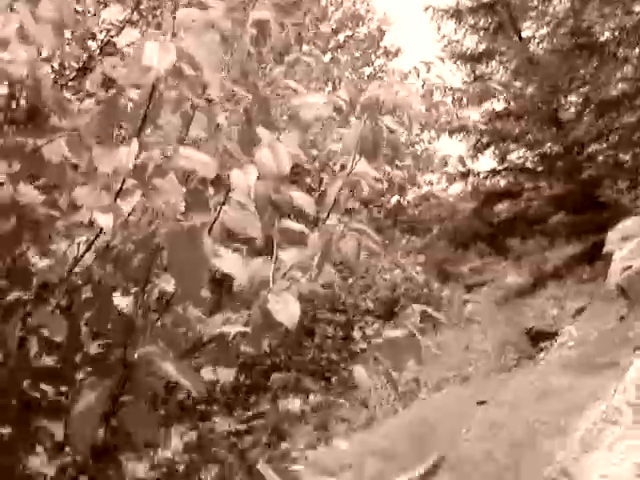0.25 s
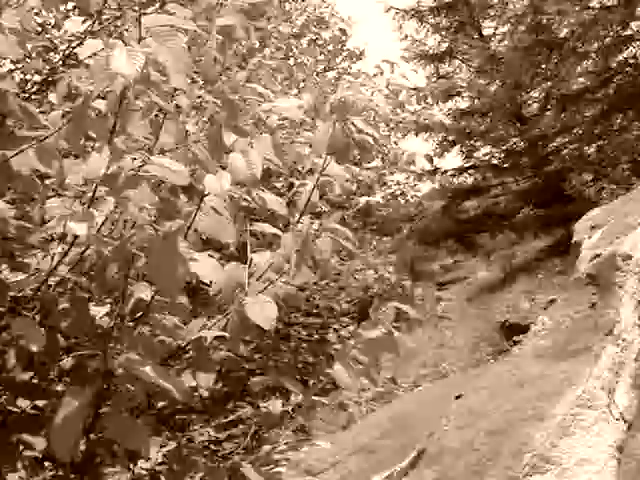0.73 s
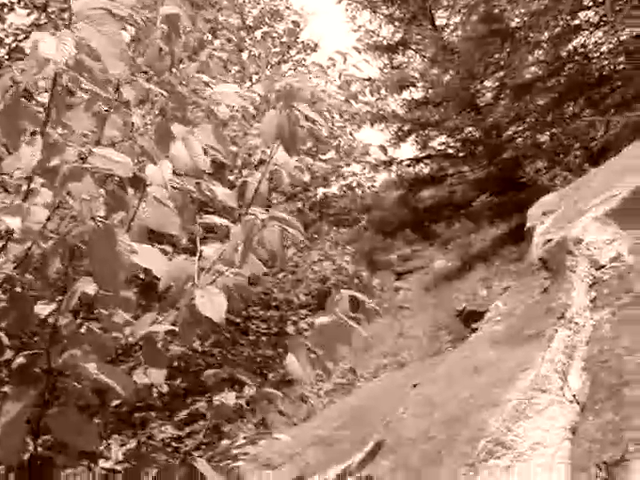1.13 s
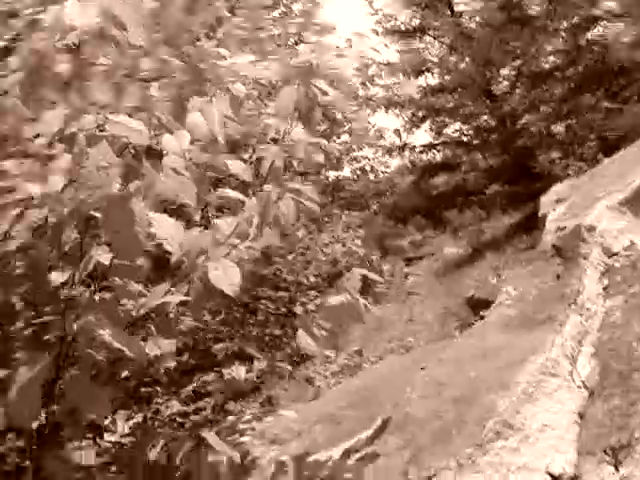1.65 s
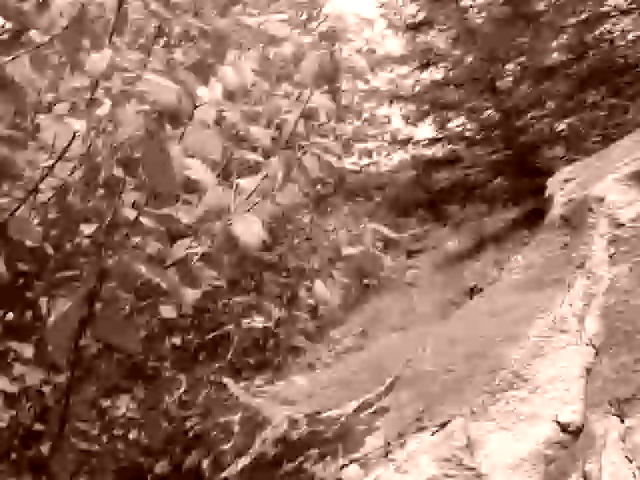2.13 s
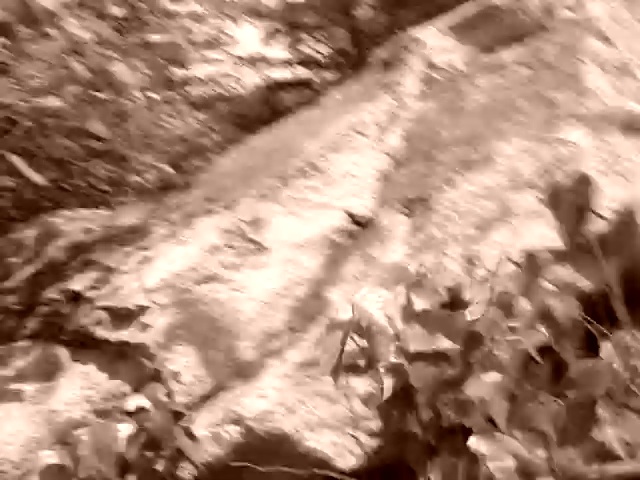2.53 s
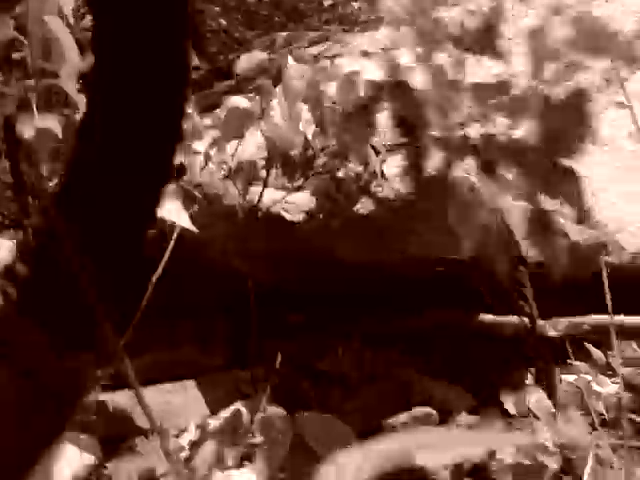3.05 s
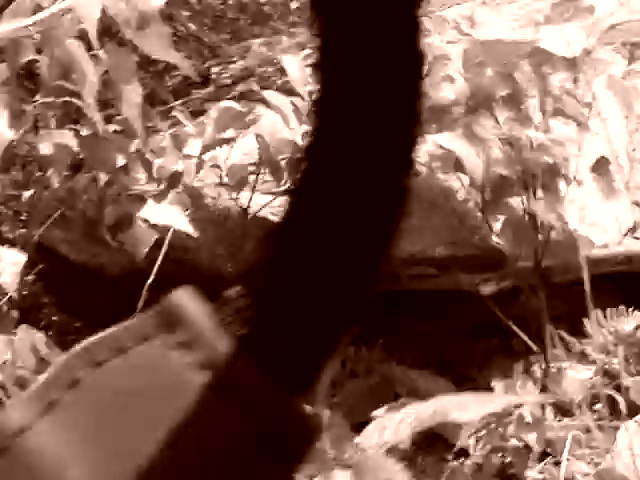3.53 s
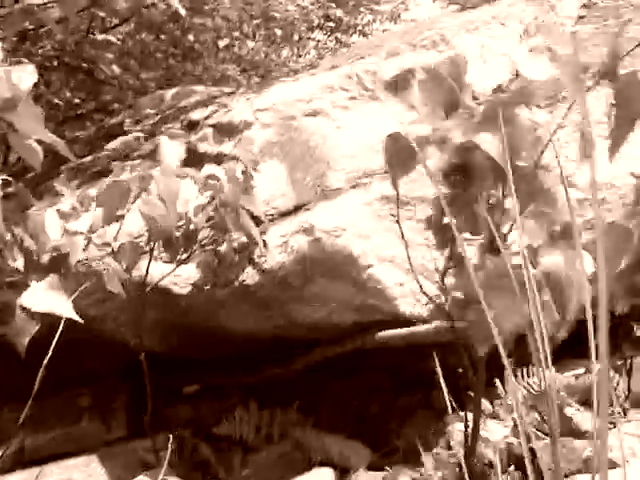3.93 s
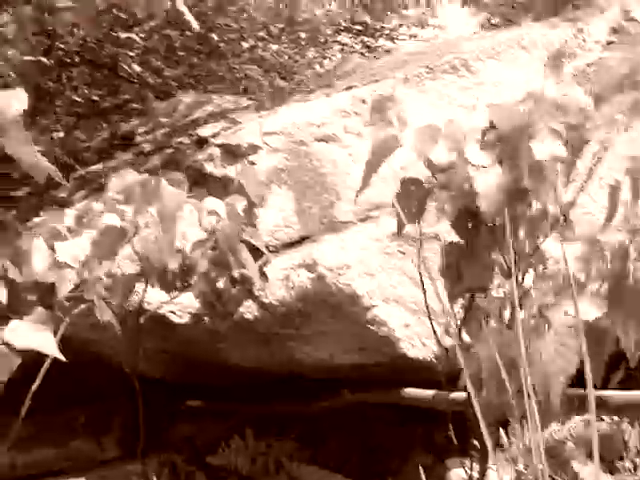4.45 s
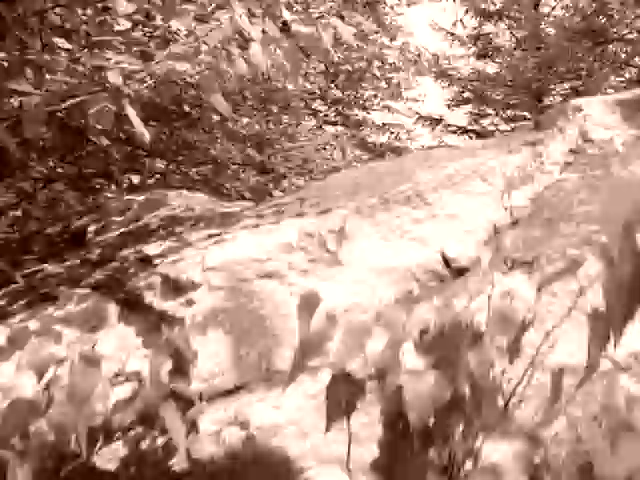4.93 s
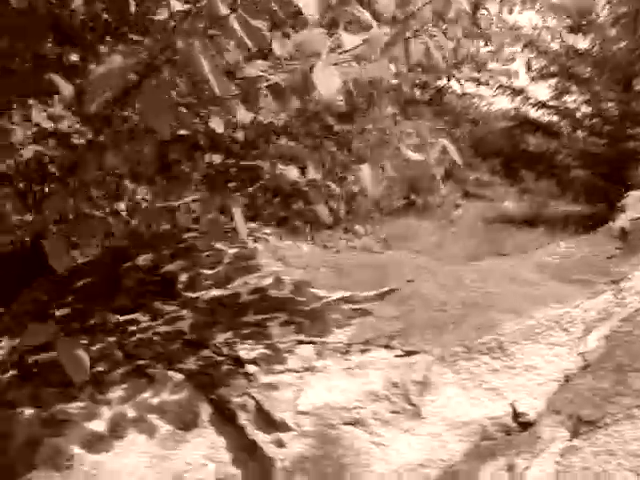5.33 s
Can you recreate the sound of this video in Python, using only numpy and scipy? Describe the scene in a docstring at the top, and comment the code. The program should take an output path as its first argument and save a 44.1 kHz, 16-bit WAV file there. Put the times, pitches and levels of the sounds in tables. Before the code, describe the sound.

Dry leaves rustle and twigs crack underfoot over the continuous high, dry buzz of a snake's rattle.

```python
"""Rattlesnake in brushy woods

A rattlesnake buzzes under a rock slab, its hollow tail segments clashing twice per shake.
Someone steps about close by: leaves rustle, soil crunches, twigs snap, loose stones knock,
stems scrape and a nylon strap or fabric squeaks faintly. The hand-held camera rumbles,
and a few low thumps sound, mostly at loud snaps."""
import sys
import numpy as np
from scipy import signal
from scipy.fft import rfft, irfft, next_fast_len
from scipy.io import wavfile
from scipy.ndimage import uniform_filter1d

SR = 44100
rng = np.random.default_rng(int(sys.argv[2]) if len(sys.argv) > 2 else 0)


def pcm_store(signal):
    """Save signal as 16-bit PCM."""
    levels = np.round(np.clip(np.atleast_2d(signal), -1, 1) * 32767)
    wavfile.write(sys.argv[1], SR, levels.astype(np.int16).T)


N = 246519
TIME_S = np.arange(N) / SR


def gain_of(db):
    """Decibels to amplitude factor."""
    return 10 ** (np.asarray(db) / 20)


def unit_rms(x):
    """Scale to rms 1."""
    return x / np.sqrt(np.mean(x ** 2) + 1e-20)


def follow(rows):
    """Per-sample curves from (time [s], values...) rows."""
    times_s, *columns = np.transpose(rows)
    return [np.interp(TIME_S, times_s, column) for column in columns]


def add(mix, start_s, sound):
    """Mix a sound in at start_s."""
    part = mix[max(round(start_s * SR), 0):][:len(sound)]
    part += sound[:len(part)]


def band(x, low_hz, high_hz, order=2):
    """Causal band-pass."""
    edges_hz = np.clip([low_hz, max(high_hz, low_hz + 10)], 1, SR / 2 - 1)
    return signal.sosfilt(signal.butter(order, edges_hz, "band", fs=SR, output="sos"), x)


def ring(x, hz, width_hz):
    """Unity-gain resonance; the centre may move."""
    carrier = np.exp(2j * np.pi * np.cumsum(hz * np.ones(len(x))) / SR)
    pole = np.exp(-np.pi * width_hz / SR)
    return 2 * (carrier * signal.lfilter([1 - pole], [1, -pole], x / carrier + 1e-18)).real


def colour(x, spectrum):
    """Filter by (frequency [Hz], gain [dB]) rows; rms 1."""
    size = next_fast_len(N)
    hz, db = np.transpose(spectrum)
    curve_db = np.interp(np.log(np.fft.rfftfreq(size, 1 / SR) + 1), np.log(hz), db)
    return unit_rms(irfft(rfft(x, size) * gain_of(curve_db), size)[:N])


def wander(rate_hz):
    """Smooth random drift, rolling off at rate_hz; rms 1."""
    size = next_fast_len(N)
    lowpass = np.exp(-(np.fft.rfftfreq(size, 1 / SR) / rate_hz) ** 2)
    return unit_rms(irfft(rfft(rng.standard_normal(size)) * lowpass, size)[:N])


def grains(per_s, spread_db):
    """Random clicks of either sign, a few much larger than the rest; rms 1."""
    size = gain_of(spread_db * np.minimum(rng.exponential(1, N), 4))
    return unit_rms(size * rng.choice([-1, 1], N) * (rng.random(N) < per_s / SR))


def at_level(x, level_db):
    """Set the rms of the loudest 3 ms."""
    return gain_of(level_db) * x / np.sqrt(uniform_filter1d(x ** 2, size=132).max() + 1e-20)


def stone_reflections(x, depth_db, width_bins):
    """Reflections from nearby stones lift and drop patches of the spectrum; rms 1."""
    spectra = signal.stft(x, SR, nperseg=512)[2]
    patches = uniform_filter1d(rng.standard_normal(spectra.shape), size=width_bins, axis=0)
    patches = uniform_filter1d(patches, size=9, axis=1)
    patches = patches - uniform_filter1d(patches, size=width_bins * 4, axis=0)
    spectra = spectra * gain_of(depth_db * unit_rms(patches))
    return unit_rms(signal.istft(spectra, SR, nperseg=512)[1][:N])


def rattle(backswing=0.19, clash_width=0.21, chatter=1.0, uneven_db=0.93, reflection_db=2.5):
    """Tail segments clash at both ends of each swing and chatter between; the slab's gap resonates."""
    # rattle as the microphone moves past: (time [s], level [dB], upper over lower ring [dB])
    passing = [(0, -36, -8), (0.8, -36, -5), (2.2, -37.5, -7.5), (2.5, -37, -5), (2.95, -36, -7),
               (3.4, -32.5, -3.5), (3.9, -34.5, -10.5), (4.4, -34, -12.5), (5.05, -39.3, -4.5),
               (5.25, -44.5, -4.5), (5.59, -51.5, -4.5)]
    # tail shaking: (time [s], rate [Hz])
    shake = [(0, 79), (.6, 79.5), (1.7, 77.7), (3.8, 77.4), (4.3, 76), (4.8, 75.4), (5.59, 74)]
    # how squarely the microphone faces the gap: (time [s], share [0-1])
    aim = [(0, .05), (3.4, 0.5), (3.75, 0), (4.25, 0.5), (4.45, 0), (4.7, 1), (5.05, 0.3), (5.59, 0.3)]
    # ring of the horny segments: (frequency [Hz], gain [dB])
    segment_spectrum = [(1500, -46), (3000, -38), (3950, -23.5), (4450, -7), (5500, -3.5), (6400, -1.8),
                        (7400, 1.5), (8400, 3.5), (9300, 2.5), (10100, -5.5)]
    # resonances of the gap: (centre [Hz], width [Hz], gain [dB])
    gap_modes = [(4900, 330, 6), (6220, 360, 4.5), (7280, 330, 4.5)]
    level_db, tilt_db = follow(passing)
    facing = np.clip(follow(aim)[0], 0, 1)
    shake_hz = follow(shake)[0] * (1 + 0.0326 * wander(13.9))
    swings = 2 * np.cumsum(shake_hz) / SR
    clash = np.exp(-((swings % 1 - 0.5) / clash_width) ** 2) * np.where(swings % 2 < 1, 1, backswing)
    # off the gap's axis, scattered sound fills the pauses between clashes
    force = (chatter + clash * (0.5 + 0.5 * facing)) * gain_of(uneven_db * wander(73))
    flutter = gain_of(0.5 * wander(45))
    clicks = unit_rms(force * flutter * grains(per_s=22000, spread_db=1.7))

    hz, frame_s, spectra = signal.stft(clicks, SR, nperseg=256)
    ring_hz, ring_db = np.transpose(segment_spectrum)
    shape_db = np.interp(np.log(hz + 1), np.log(ring_hz), ring_db)[:, None]
    tilt = np.tanh((hz - 7500) / 1000) / 2
    shape_db = shape_db + np.outer(tilt, np.interp(frame_s, TIME_S, tilt_db))
    gap_db = sum(db * np.exp(-((hz - centre_hz) / width_hz) ** 2) for centre_hz, width_hz, db in gap_modes)
    shape_db = shape_db + np.outer(gap_db, np.interp(frame_s, TIME_S, facing))
    # reflections from stones shift as tail and microphone move
    patches = uniform_filter1d(rng.standard_normal(spectra.shape), size=36, axis=1)
    patches = uniform_filter1d(patches, size=2, axis=0)
    shape = gain_of(shape_db + reflection_db * unit_rms(patches))
    shape /= np.sqrt((shape[hz > 6000] ** 2).sum(0))  # constant treble power gain
    buzz = signal.istft(spectra * shape, SR, nperseg=256)[1][:N]
    return gain_of(level_db) * unit_rms(buzz)


def handling():
    """Hand rumble carried by the camera's body."""
    # rumble: (time [s], level [dB])
    levels = [(0, -63.5), (2, -69.5), (2.3, -59.5), (2.9, -63.5), (4.9, -68.5), (5.15, -61), (5.35, -65),
              (5.52, -60), (5.59, -45)]
    # body response: (frequency [Hz], gain [dB])
    spectrum = [(15, 3.0), (35, -0.5), (90, 7.5), (170, -1.0), (500, -25.0), (2000, -77)]
    return gain_of(follow(levels)[0]) * colour(rng.standard_normal(N), spectrum)


def air(level_db=-60.5):
    """Faint, steady hush of the woods."""
    # still air: (frequency [Hz], gain [dB])
    spectrum = [(20, -13), (70, -12), (200, 9.5), (450, 14), (900, 7), (1800, -20), (4000, -14.5),
                (10000, -11)]
    return gain_of(level_db) * colour(rng.standard_normal(N), spectrum)


def footsteps(leaf_floor_db=-53, soil_floor_db=-54, roundness=1.42):
    """Each step swells and fades: leaves crackle in clumps, soil crunches under the weight."""
    # steps and pushes through brush: (peak time [s], rise [s], fall [s], leaves [dB], soil [dB])
    steps = [(0.192, 0.053, 0.013, -34, -48.5), (0.366, 0.055, 0.029, -33, -45),
             (0.47, 0.055, 0.086, -44.5, -44.5), (0.69, 0.028, 0.067, -40, -52),
             (0.838, 0.011, 0.017, -29.5, -49), (1.07, 0.071, 0.046, -31.5, -48.5),
             (1.388, 0.05, 0.027, -32, -46), (1.56, 0.22, 0.15, -44.5, -52),
             (1.87, 0.094, 0.21, -52, -43.5), (2.02, 0.11, 0.077, -32, -41.5),
             (2.165, 0.013, 0.011, -38, -44), (2.239, .02, 0.056, -43.5, -48.5),
             (2.55, .14, 0.14, -35.5, -35.5), (2.851, 0.093, 0.13, -35, -41),
             (3.07, 0.19, 0.18, -30.5, -45), (3.36, 0.061, 0.27, -39.5, -47.5),
             (3.555, 0.033, 0.032, -22.5, -36), (3.65, 0.076, 0.16, -35, -56.5),
             (3.901, 0.058, 0.065, -29.5, -38.5), (4.06, 0.052, 0.084, -30, -43),
             (4.45, 0.057, 0.061, -34.5, -50), (4.614, 0.041, 0.025, -31, -36.5),
             (4.83, 0.027, 0.077, -39, -43.5), (4.962, .07, 0.051, -30, -49),
             (5.06, 0.12, 0.38, -44, -50.5), (5.47, 0.12, 0.025, -66, -49)]
    # dry leaves: (frequency [Hz], gain [dB])
    leaf_spectrum = [(500, -45), (1200, -6.5), (1900, -0.5), (2900, 7), (3800, 6), (5200, 3), (6500, 2),
                     (10000, -4)]
    # gritty soil: (frequency [Hz], gain [dB])
    soil_spectrum = [(30, -22.5), (80, -17), (160, -2), (380, 3), (600, 3), (850, 3), (1300, 0.5),
                     (2200, -2.5), (5000, -44)]
    # the brush never quite settles between steps
    leaf_power, soil_power = gain_of(leaf_floor_db) ** 2, gain_of(soil_floor_db) ** 2
    for peak_s, rise_s, fall_s, leaf_db, soil_db in steps:
        width_s = np.where(TIME_S < peak_s, rise_s, fall_s)
        push = np.exp(-abs((TIME_S - peak_s) / width_s) ** roundness)  # 1 pointed, 2 bell
        leaf_power = leaf_power + (gain_of(leaf_db) * push) ** 2
        soil_power = soil_power + (gain_of(soil_db) * push) ** 2
    crackle = grains(per_s=6000, spread_db=2.4) * gain_of(2.0 * wander(110))
    leaves = stone_reflections(colour(crackle, leaf_spectrum), depth_db=2.5, width_bins=4)
    grit = grains(per_s=2500, spread_db=2.0) * gain_of(2.0 * wander(67))
    soil = stone_reflections(colour(grit, soil_spectrum), depth_db=3.5, width_bins=2)
    return np.sqrt(leaf_power) * leaves + np.sqrt(soil_power) * soil


def twig_snaps(edge_ratio=1.54, splinter=0.25, splinter_s=0.0034, ring_gain=0.85, bounce=0.24):
    """One sharp crack, then splintering fibres; the stick rings and adds a dull body."""
    # breaking twigs: (time [s], level [dB], pitch [Hz], body over ringing wood [dB])
    snaps = [(0.089, -33.5, 1940, 12), (0.116, -34, 2000, 6), (0.394, -31, 2930, -4.5),
             (0.606, -26, 2370, -5), (0.617, -32, 2300, -4), (0.632, -36, 2370, -5),
             (0.645, -26.5, 2800, -16), (0.669, -32, 2700, -8), (1.011, -33.5, 2200, -6),
             (1.542, -26, 3000, -3.5), (1.59, -35, 1780, 9), (2.174, -23, 3570, -12),
             (2.217, -29.5, 3120, -12), (2.353, -21.5, 3740, -12), (2.41, -17, 3200, -13),
             (2.441, -26, 3000, -3), (2.454, -31, 3030, -25), (2.471, -21.5, 3530, -5.5),
             (2.583, -18.5, 3070, 3.5), (2.617, -29, 3140, -24), (2.683, -28.5, 3470, -7),
             (2.764, -19, 3630, -13), (2.8, -23, 2460, -4), (2.815, -26.5, 2860, -7),
             (2.968, -23.5, 3660, -7.5), (3.125, -24, 3650, -16), (3.328, -22.5, 2880, -22),
             (3.426, -28, 2880, -3), (3.548, -16, 2690, -24), (3.811, -26.5, 2930, -29),
             (3.899, -17.5, 2420, -8.5), (3.905, -21.5, 3360, -5), (4.431, -19.5, 4350, -33),
             (4.634, -23.5, 2100, -3.5), (4.81, -20.5, 3350, -11.5), (5.058, -20, 3650, -16.5),
             (5.102, -19, 3100, -15.5), (5.447, -37.5, 1950, 1), (5.505, -28.5, 4000, -9.5)]
    out, t = np.zeros(N), np.arange(2400) / SR
    for (start_s, level_db, hz, body_db), fibres in zip(snaps, rng.standard_normal((len(snaps), len(t)))):
        crack = (t == 0) + splinter * fibres * np.exp(-t / splinter_s)
        wood = unit_rms(band(crack, hz / edge_ratio, hz * edge_ratio, order=3))
        wood = unit_rms(wood + ring_gain * unit_rms(ring(wood, hz, width_hz=380)))
        body = gain_of(body_db) * unit_rms(band(crack, 500, 1660))
        snap = band(wood + body, 200, 4150, order=4)  # soft fibres give little treble
        echo_s = rng.uniform(0.0009, 0.0016)  # ground bounce makes it hollow
        echo = bounce * np.roll(snap, round(echo_s * SR))
        add(out, start_s, at_level(snap + echo, level_db))
    return out


def stone_knocks(edge_ratio=1.277, grit=0.12):
    """A heavy, damped blow with grit grinding after it."""
    # stones and boots: (time [s], level [dB], pitch [Hz], grit decay [s])
    knocks = [(.090, -33.5, 854, .0035), (0.393, -45, 150, 0.0086), (0.609, -36, 374, 0.025),
              (1.019, -43, 270, 0.053), (2.384, -24, 567, 0.00075), (2.428, -28.5, 560, .002),
              (2.5877, -16, 894, 0.0028), (2.589, -25, 350, .0017), (2.589, -26.5, 150, 0.0037),
              (2.6, -28.5, 427, 0.0053), (2.809, -32, 470, 0.014), (4.143, -45, 152, 0.012),
              (5.103, -32, 790, .004), (5.176, -37, 855, 0.0068), (5.506, -33, 770, 0.0043)]
    out, t = np.zeros(N), np.arange(4000) / SR
    for start_s, level_db, hz, decay_s in knocks:
        blow = (t == 0) + grit * rng.standard_normal(len(t)) * np.exp(-t / decay_s)
        add(out, start_s, at_level(band(blow, hz / edge_ratio, hz * edge_ratio), level_db))
    return out


def stem_scrapes(edge_ratio=1.73, swish_db=-12):
    """A stem drags past in a quick run of tiny slips."""
    # stems and leaves: (time [s], length [s], level [dB], pitch [Hz], swell [0 abrupt - 1 gradual])
    scrapes = [(0.223, 0.053, -31.5, 3180, 0.046), (1.888, 0.12, -36.5, 4070, 0.39),
               (2.506, 0.043, -36, 5340, 0.45), (3.513, 0.085, -32, 3840, 0.71),
               (3.809, 0.038, -33, 3620, 0.28), (3.893, 0.025, -30, 2230, 0.35),
               (4.431, 0.033, -24.5, 3800, 0.11), (4.586, 0.046, -33.5, 3280, 0.49),
               (4.855, 0.039, -35.5, 3850, 0.64), (5.025, 0.022, -32.5, 5700, 0.52)]
    out = np.zeros(N)
    slips = grains(per_s=12000, spread_db=1.2) * gain_of(1.7 * wander(400))
    for start_s, length_s, level_db, hz, swell in scrapes:
        run = slips[round(start_s * SR):][:round(length_s * SR)]
        run = np.pad(run * signal.windows.tukey(len(run), swell), (0, 200))
        rasp = unit_rms(band(run, hz / edge_ratio, hz * edge_ratio, order=4))
        swish = unit_rms(band(run, 700, 7000, order=1))
        add(out, start_s, gain_of(level_db) * (rasp + gain_of(swish_db) * swish))
    return out


def rubbing_squeaks(width_hz=240):
    """Faint, narrow squeaks from the uneven slips of a nylon strap or fabric rubbing."""
    # squeaks: (time [s], length [s], level [dB], start pitch [Hz], end pitch [Hz])
    squeaks = [(1.95, 0.15, -43.5, 2680, 2820), (2.005, 0.078, -44, 1570, 1510),
               (4.915, 0.08, -39, 3000, 3120), (4.916, 0.32, -47.5, 1510, 1400)]
    out = np.zeros(N)
    slips = grains(per_s=1500, spread_db=2.2)
    for start_s, length_s, level_db, start_hz, end_hz in squeaks:
        run = slips[round(start_s * SR):][:round(length_s * SR)]
        hz = np.linspace(start_hz, end_hz, len(run))
        tone = ring(ring(run, hz, width_hz), hz, width_hz)
        add(out, start_s, gain_of(level_db) * unit_rms(tone * signal.windows.tukey(len(run), 0.5)))
    return out


def low_thumps(rise_s=0.0007, fall_s=0.01):
    """Short, one-sided low thumps in the recorder, mostly at loud snaps."""
    # thumps: (time [s], peak [dB])
    thumps = [(2.41, -28.5), (2.615, -31), (2.629, -31), (2.762, -29), (3.547, -30.5), (4.088, -29.5),
              (4.434, -34)]
    out, t = np.zeros(N), np.arange(4000) / SR
    pulse = (1 - np.exp(-(t / rise_s) ** 2)) * np.exp(-t / fall_s)
    for start_s, peak_db in thumps:
        add(out, start_s, gain_of(peak_db) * pulse / pulse.max())
    return out


def scene():
    """Snake, walker and quiet air at one microphone."""
    hush = air()
    walker = footsteps() + twig_snaps() + stone_knocks() + stem_scrapes() + rubbing_squeaks()
    return (rattle() + walker + low_thumps() + handling() + hush)[None]


def record(dry):
    """The small camera rounds off the loudest peaks and limits the band."""
    ceiling, cutoff_hz = 0.7, 10130
    rounded = ceiling * np.tanh(dry / ceiling)
    lowpass = signal.firwin(801, cutoff_hz, window=("kaiser", 9), fs=SR)
    return signal.oaconvolve(rounded, lowpass[None], "same")


dry = scene()
out = record(dry)
pcm_store(out)
```